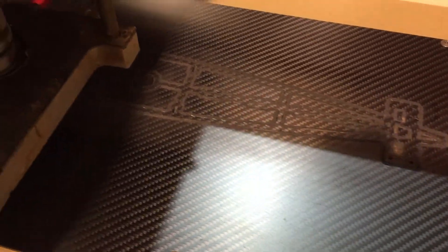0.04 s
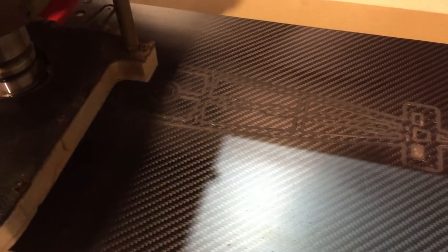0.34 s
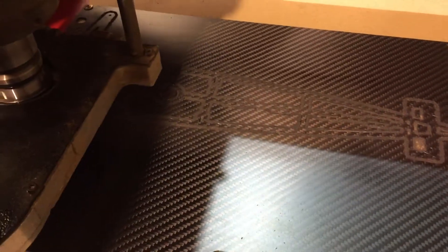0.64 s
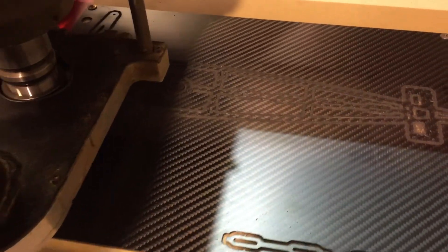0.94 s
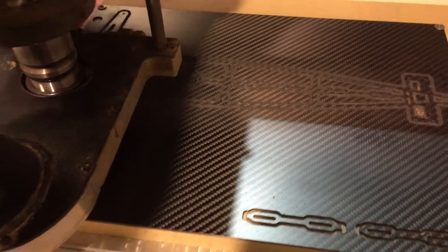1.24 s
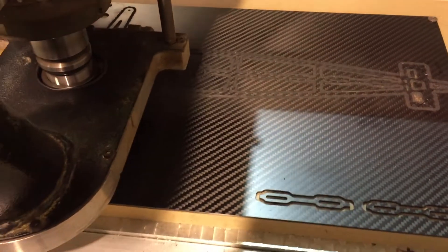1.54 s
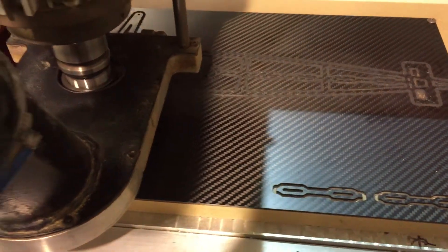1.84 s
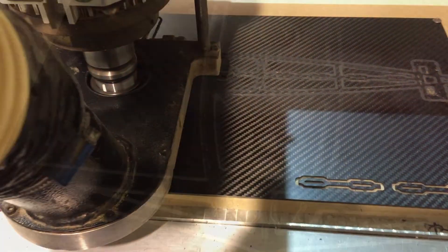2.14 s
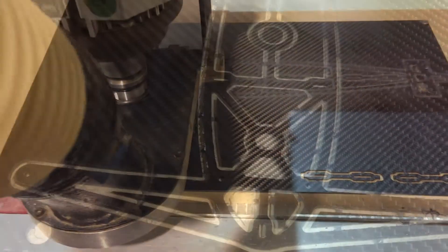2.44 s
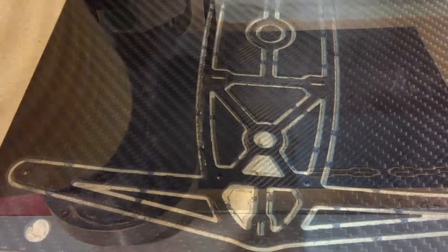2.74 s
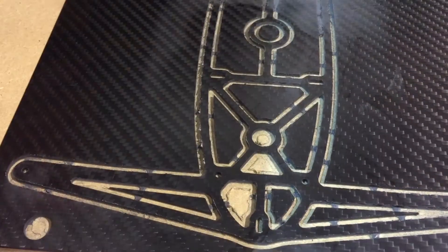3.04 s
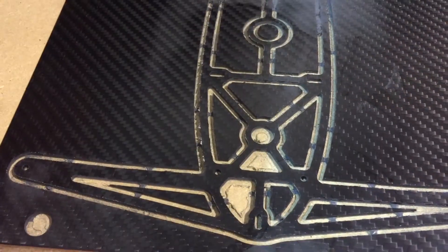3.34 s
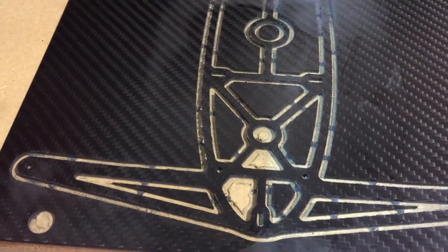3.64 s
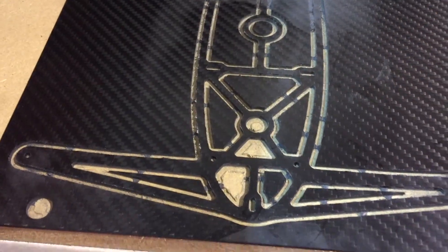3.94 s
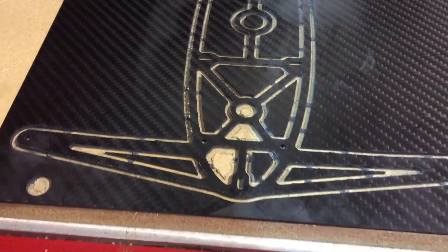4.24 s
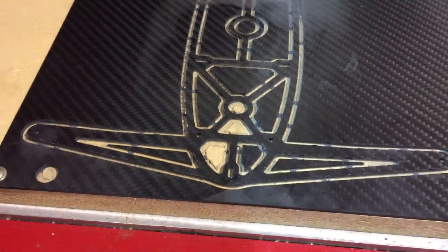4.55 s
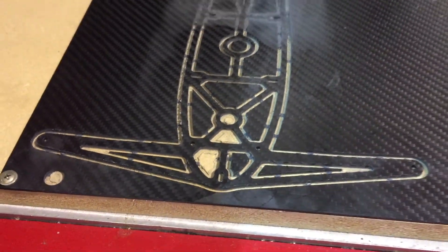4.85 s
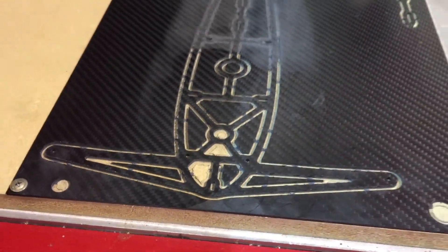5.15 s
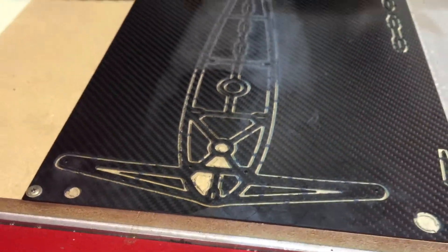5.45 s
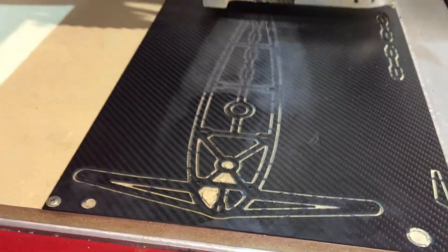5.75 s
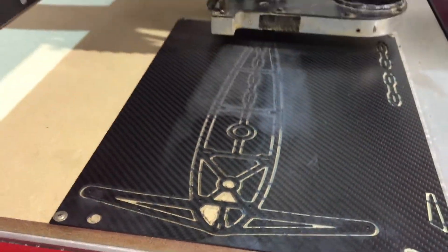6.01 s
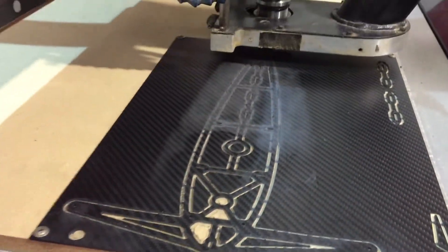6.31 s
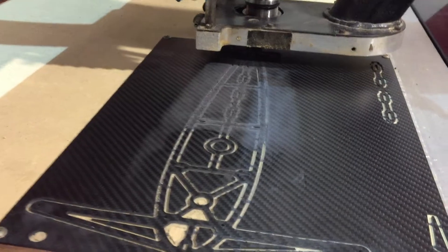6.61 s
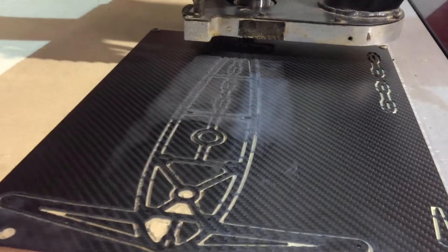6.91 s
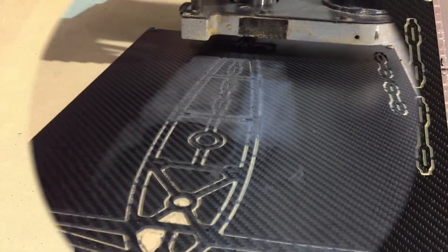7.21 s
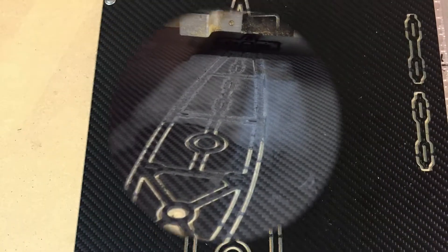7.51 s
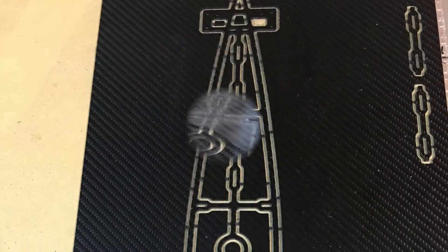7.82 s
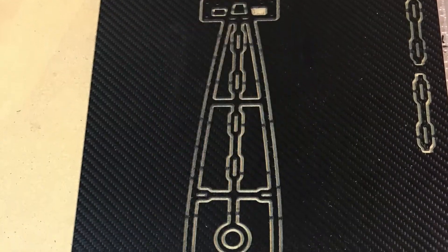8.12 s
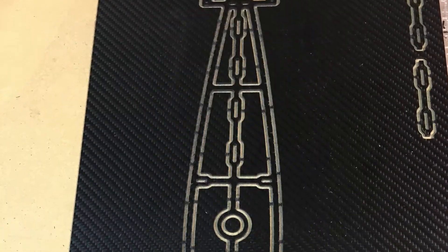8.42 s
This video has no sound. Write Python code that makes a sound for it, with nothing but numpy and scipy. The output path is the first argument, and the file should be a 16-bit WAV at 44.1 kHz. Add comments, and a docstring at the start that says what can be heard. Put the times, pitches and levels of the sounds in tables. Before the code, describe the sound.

A CNC router spindle is already running at the start, close by in a workshop: a steady low-mid hum with a faint buzz and a broad rush of cooling air. Over the first two seconds a high, slightly fluttering fan whine comes forward. A dust extractor rumbles and hisses softly underneath. Around 2.6 seconds the rush dips briefly, then returns with a little more hiss, and a thin, very high bearing whistle becomes clearer. The microphone moves around the table, so the air changes colour and the overtones swell and recede, while the pitch stays constant. The low hum gradually thins until about 5.5 seconds. Near 6 seconds a breathy, hollow ring rises briefly as the whistle drops back; the whistle returns around 7 seconds. From about 7.3 seconds everything fades, reaching silence at 8 seconds.

```python
"""Walking round a CNC router

A spindle turns about 280 times a second over a carbon fibre sheet. Its shaft hums, its cooling fan
whines and blows, the bearings whistle, and a dust extractor rumbles and hisses by the bit.
The speed holds steady; as the listener circles the table, the sheet and the workshop colour the rush
differently at each spot. Mono, with a fade at the end."""
import sys
import numpy as np
from scipy.fft import rfft, irfft, next_fast_len
from scipy.io import wavfile
from scipy.ndimage import map_coordinates

SR = 44100
rng = np.random.default_rng(int(sys.argv[2]) if len(sys.argv) > 2 else 0)


def waveform_to_disk(signal):
    """Save audio, clipped to [-1, 1], as 16-bit WAV at the path in sys.argv[1]."""
    frames = np.transpose(np.atleast_2d(signal))
    scaled = np.clip(frames, -1, 1) * 32767
    samples = np.round(scaled).astype(np.int16)
    wavfile.write(sys.argv[1], SR, samples)


N = 373522
T = np.arange(N) / SR
SHAFT_HZ = 280.33
SWELL_RATE = 2.8  # knots a second in the slow level drift of the shaft's upper orders

# the shaft's second and third orders along the walk: t/s, level/dB
SECOND_ORDER_RIDE = [(0, -66.5), (2.15, -56.5), (2.45, -62.0), (3.1, -52.5), (3.27, -61), (3.45, -53),
                     (3.9, -53.5), (4.2, -58.0), (4.95, -55.5), (5.3, -52.5), (5.7, -55), (7.25, -52.5)]
THIRD_ORDER_RIDE = [(0, -70), (0.9, -69.5), (2.3, -59.5), (3.0, -74.5), (3.6, -61), (5.0, -57.5),
                    (5.3, -64.5), (6.2, -63.5), (6.5, -53), (7.25, -52.5)]
# faint high orders: multiple of the shaft speed, level beside the spindle/dB, level over the sheet/dB
SLOT_ORDERS = [(5, -65.5, -65), (18, -72.5, -74.5), (24, -80, -71), (51, -70, -78.5), (54, -77, -76),
               (55, -81.5, -78.5)]
# the listener's walk round the table: t/s, spot (0-4)
WALK = [(0, 0), (1.6, 0), (2.1, 1), (2.4, 1), (2.9, 2), (4.1, 2), (4.9, 3), (6.0, 3), (6.7, 4)]
# colour of the fan's rush at spots 0 to 4: f/Hz, relative level/dB
CLOSE_COLOUR = [(400, -48.5), (650, -18.5), (860, -13), (1380, 0.5), (2380, -9.5), (2490, -10.5),
                (2710, -9), (3850, -9.5), (4490, -13.5), (4640, -8), (4870, -19), (6450, -17.5),
                (6720, -15.5), (8260, -22), (8770, -18.5), (9190, -23), (9400, -22), (11500, -55)]
HOSE_COLOUR = [(400, -32), (650, -11), (900, -10), (1400, 0.5), (2000, -6.5), (2600, -8), (4200, -9),
               (4900, -13.5), (5400, -13), (6200, -13.5), (6900, -15.5), (7700, -23), (8900, -17.5),
               (11500, -49)]
FRONT_COLOUR = [(400, -46), (650, -15.5), (710, -18.5), (1030, -10.5), (1340, -0.5), (2660, -4),
                (3190, -8.5), (3510, -10), (3850, -15), (4420, -8.5), (4800, -13.0), (5680, -12.5),
                (5930, -18), (6370, -13), (7090, -16.5), (7370, -22), (9400, -20.5), (11500, -43)]
BACK_COLOUR = [(400, -29), (650, -9.5), (1070, -10), (1640, 0.5), (1870, -6), (2120, 1), (2600, -2),
               (2710, -4), (3380, -8), (4060, -16), (4570, -9.5), (4870, -13.5), (5430, -8), (6020, -16.5),
               (6810, -12.5), (7570, -20.5), (9400, -19), (11500, -48.5)]
SIDE_COLOUR = [(400, -42), (650, -19.5), (770, -13.5), (1380, -8), (1500, -2), (1970, -7.5), (2220, 0.0),
               (2830, -8.5), (3380, -7.5), (4200, -15), (4570, -16), (4950, -18.5), (5680, -13),
               (6540, -21), (7190, -16), (7370, -21), (9400, -21.5), (11500, -40)]
# strength of the rush at each of those spots: level/dB
SPOT_LEVELS = [-43.5, -44.6, -42.3, -42.5, -42]
# the fan's blade note and its octave along the walk: t/s, level/dB
BLADE_RIDE = [(0, -66), (0.45, -54.5), (1.9, -47), (2.9, -53), (3.2, -50), (4.0, -53), (5.05, -46.0),
              (5.6, -49.5), (6.2, -47.5), (6.7, -52), (7.25, -48.5)]
OCTAVE_RIDE = [(0, -56), (0.75, -57), (1.0, -68), (2.5, -74.5), (2.85, -59), (4.7, -57), (5.5, -76),
               (5.95, -56.5), (6.4, -61.5), (6.95, -52), (7.25, -61)]
# the bearings' whistle cluster and race tones: f/Hz, relative level/dB
WHISTLE_TONES = [(7713, -23.5), (7993, -26), (8273, -9.5), (8741, -10), (8834, 4.5), (9270, -22),
                 (9675, -22)]
RACE_TONES = [(2716.5, 0.5), (3278, -3.5), (5434, -13)]
# the whistle along the walk, ahead of its trim: t/s, level/dB
WHISTLE_RIDE = [(0, -74), (0.8, -77.0), (1.7, -63.5), (2.0, -72), (2.42, -77.5), (2.7, -60.5),
                (3.15, -56.5), (4.0, -59.5), (4.8, -56.5), (5.5, -59.5), (5.85, -72), (6.3, -68.5),
                (6.95, -52.5), (7.25, -57)]
# colour of the extractor's suction rumble and dust hiss: f/Hz, relative level/dB
SUCTION_COLOUR = [(40, -34.5), (85, -7), (130, -7), (165, -0.5), (240, 2), (400, 2.5), (560, -4),
                  (650, -5.5), (900, -37)]
DUST_COLOUR = [(8500, -37.5), (9400, -4.5), (9900, -1.5), (10450, -0.5), (11100, 3.5), (12000, 3),
               (13800, -0.5), (15700, -3.5)]
# a hollow ring that blooms on one side of the table: t/s, level/dB
RING_RIDE = [(4.6, -67.5), (5.3, -69), (5.8, -53), (6.0, -50.5), (6.45, -53), (6.7, -69)]
# lag of the bounce off the sheet: t/s, delay/ms
SHEET_DELAY = [(0.5, 0.89), (1.3, 0.95), (2.3, 0.96), (3.0, 1.45), (4.1, 1.4), (4.8, 1.18), (5.5, 1.06),
               (6.1, 1), (6.7, 1.53)]
# colour of the workshop's low room tone: f/Hz, relative level/dB
WORKSHOP_COLOUR = [(25, -28.5), (38, -21.5), (48, -2), (58, -7), (85, -0.5), (110, -1), (150, -4),
                   (300, -27)]


def shaft_hum(angle, over_sheet, start_db=-41.5, retreat_db=-7, retreat_s=5.5):
    """Unbalance and the bit's flutes hum at the low orders; the motor's slots sing at the high ones."""
    fundamental_db = start_db + retreat_db * ramp(0, retreat_s)  # thins as the listener backs away
    hum = amp(fundamental_db) * tone(angle, rough=0.001, width_hz=8)
    hum += amp(curve(SECOND_ORDER_RIDE)) * tone(2 * angle, rough=0.059, width_hz=13)
    hum += amp(curve(THIRD_ORDER_RIDE)) * tone(3 * angle, rough=0.014, width_hz=12)
    for multiple, beside_db, over_db in SLOT_ORDERS:
        swell_db = 0.5 * wobble(SWELL_RATE)  # walking through standing waves
        level_db = beside_db + over_sheet * (over_db - beside_db) + swell_db
        hum += amp(level_db) * tone(multiple * angle, rough=0.12, width_hz=18)
    return hum


def shaft_buzz(angle, tenth_order_db=-76, db_per_decade=-14, swell_db=2):
    """Small faults of the shaft put a faint buzz on orders 4 to 33, softer toward the top."""
    buzz = np.zeros(N)
    for multiple in range(4, 34):
        level_db = tenth_order_db + db_per_decade * np.log10(multiple / 10)
        gain = amp(level_db + swell_db * wobble(SWELL_RATE))
        buzz += gain * np.sin(multiple * angle + 2 * np.pi * rng.random())
    return buzz


def fan_rush(angle):
    """Cooling air pulses faintly with each turn; its colour and strength glide from spot to spot."""
    colours = [CLOSE_COLOUR, HOSE_COLOUR, FRONT_COLOUR, BACK_COLOUR, SIDE_COLOUR]
    position = curve(WALK)
    rush = np.zeros(N)
    for spot, (level_db, colour) in enumerate(zip(SPOT_LEVELS, colours)):
        crossfade = np.sqrt(np.clip(1 - np.abs(position - spot), 0, 1))  # equal power
        rush += crossfade * amp(level_db) * noise(colour)
    pulsing = 1 + 0.043 * np.cos(angle)
    flutter = amp(0.39 * wobble(60))
    return flutter * pulsing * rush


def fan_whine(angle, over_sheet, blades=6, rough_beside=0.07, rough_over=0.13):
    """The blades chop uneven air, so their note flutters, less so beside the spindle."""
    blade_phase = blades * angle
    rough = rough_beside + over_sheet * (rough_over - rough_beside)
    note = amp(curve(BLADE_RIDE)) * tone(blade_phase, rough=rough, width_hz=46)
    octave = amp(curve(OCTAVE_RIDE)) * tone(2 * blade_phase, rough=0.39, width_hz=45)
    return note + octave


def bearings(over_sheet, whistle_trim_db=-4, race_db=-70, race_lift_db=9):
    """Rolling balls whistle between the shaft's orders; the race carries best out over the sheet."""
    whistle = sum(amp(db) * tone(phase_at(hz), rough=0.02, width_hz=9.6) for hz, db in WHISTLE_TONES)
    race = sum(amp(db) * tone(phase_at(hz), rough=0.17, width_hz=10) for hz, db in RACE_TONES)
    whistle *= amp(curve(WHISTLE_RIDE) + whistle_trim_db)
    race *= amp(race_db + race_lift_db * over_sheet)
    return whistle + race


def dust_extractor(over_sheet, motor_hz=318.7):
    """Suction rumble and motor hum creep nearer; the dust hiss opens over the sheet and slowly recedes."""
    rumble_db = -60.5 + 0.48 * T + 4.3 * over_sheet
    motor_db = -76.5 + 2.5 * T
    hiss_db = -61.5 - 0.67 * T + 5.9 * over_sheet
    rumble = amp(rumble_db) * noise(SUCTION_COLOUR)
    motor = amp(motor_db) * tone(phase_at(motor_hz), rough=0.1, width_hz=4)
    hiss = amp(hiss_db + 0.25 * wobble(40)) * noise(DUST_COLOUR)
    return rumble + motor + hiss


def hollow_ring(ring_hz=2570):
    """Air excites a narrow, breathy resonance that stands out on one side of the table."""
    return amp(curve(RING_RIDE)) * tone(phase_at(ring_hz), rough=1, width_hz=90)


def sheet_bounce(air, reflection=0.1):
    """A late copy off the hard sheet hollows out the air; its comb slides as the listener moves."""
    delay_samples = curve(SHEET_DELAY) * SR / 1000
    return air + reflection * map_coordinates(air, [np.arange(N) - delay_samples])


def wall_echoes(air, count=10, strength=0.05, earliest_s=0.002, latest_s=0.014):
    """Weak early reflections from the gantry and the walls ripple the colour of the air."""
    delays = np.round(SR * rng.uniform(earliest_s, latest_s, count)).astype(int)
    echoes = sum(np.pad(air, (delay, 0))[:N] for delay in delays)
    return (air + strength * echoes) / np.sqrt(1 + count * strength ** 2)


def workshop(level_db=-70):
    """A steady bed of low room rumble under the machine."""
    return amp(level_db) * noise(WORKSHOP_COLOUR)


def tone(phase, rough, width_hz):
    """A partial of rms 1: turbulence smears the share `rough` of its power into a narrow skirt."""
    knots = rng.standard_normal(4096) + 1j * rng.standard_normal(4096)
    skirt = unit(np.interp(2 * width_hz * T, np.arange(len(knots)), knots))
    core = np.sqrt(1 - rough) * np.exp(2j * np.pi * rng.random())
    envelope = core + np.sqrt(rough) * skirt
    return np.sqrt(2) * (envelope.real * np.cos(phase) + envelope.imag * np.sin(phase))


def noise(colour):
    """Noise of rms 1, shaped by an EQ curve of f/Hz, level/dB points."""
    points_hz, points_db = np.transpose(colour)
    white = rng.standard_normal(N)
    return unit(filtered(white, lambda hz: amp(np.interp(np.log(hz + 1), np.log(points_hz), points_db))))


def filtered(x, response):
    """x through an EQ whose gain is response(hz)."""
    size = next_fast_len(N + 8192)
    return irfft(rfft(x, size) * response(np.fft.rfftfreq(size, 1 / SR)), size)[:N]


def wobble(rate):
    """A smooth random curve, rate knots a second."""
    return map_coordinates(rng.standard_normal(int(N * rate / SR) + 4), [T * rate])


def curve(points):
    """Straight lines through t/s, value points."""
    times, values = np.transpose(points)
    return np.interp(T, times, values)


def ramp(start_s, length_s):
    """A straight rise from 0 to 1."""
    return np.clip((T - start_s) / length_s, 0, 1)


def phase_at(hz):
    """Running phase of a steady pitch, in radians."""
    return 2 * np.pi * hz * T


def amp(db):
    """Decibels to gain."""
    return 10 ** (np.asarray(db) / 20)


def unit(x):
    """Scaled to rms 1."""
    return x / np.sqrt(np.mean(np.abs(x) ** 2) + 1e-20)


def scene(dip_db=-2.5, dip_at_s=2.61, dip_half_width_s=0.28):
    """One shaft turns the whole spindle at a constant speed, heard from one spot after another."""
    angle = phase_at(SHAFT_HZ)
    over_sheet = ramp(start_s=2.37, length_s=0.4)  # 0 beside the spindle, 1 out over the sheet
    air = fan_rush(angle) + dust_extractor(over_sheet)
    air = wall_echoes(sheet_bounce(air))
    # the air dips briefly as one listening position dissolves into the next
    air *= amp(dip_db * np.exp(-((T - dip_at_s) / dip_half_width_s) ** 2))
    air += hollow_ring()
    room_tone = workshop()
    shaft = shaft_hum(angle, over_sheet) + shaft_buzz(angle)
    mono = shaft + fan_whine(angle, over_sheet) + bearings(over_sheet) + air + room_tone
    return np.array([mono, mono])


def record(dry, fade_start_s=7.25, fade_end_s=8.021, fade_power=1.59, high_cut_hz=15720):
    """A fade to silence, then a brick-wall high cut."""
    fade = np.clip((fade_end_s - T) / (fade_end_s - fade_start_s), 0, 1) ** fade_power
    return np.array([filtered(fade * channel, lambda hz: hz < high_cut_hz) for channel in dry])


dry = scene()
out = record(dry)
waveform_to_disk(out)
```